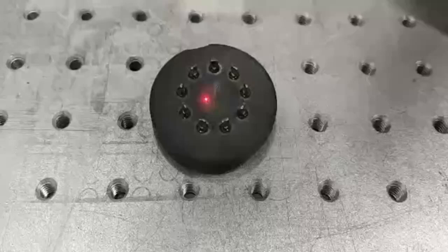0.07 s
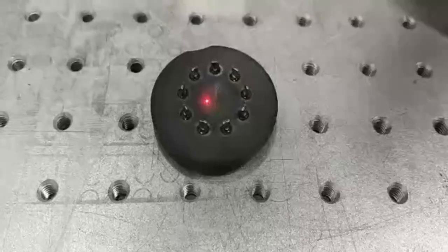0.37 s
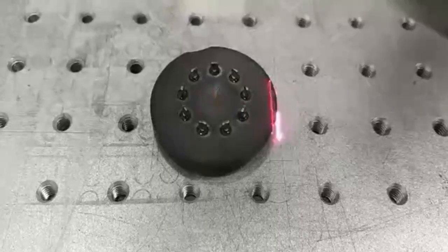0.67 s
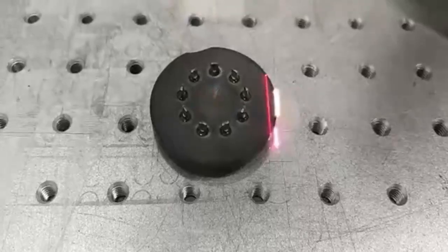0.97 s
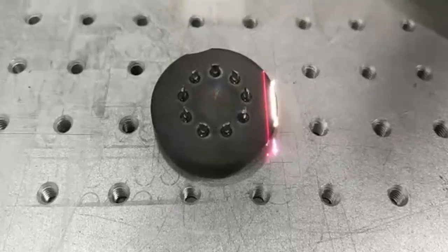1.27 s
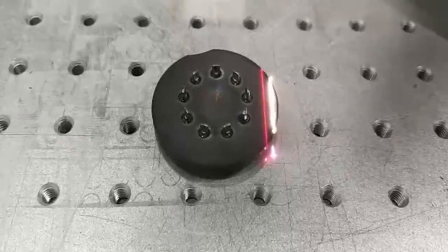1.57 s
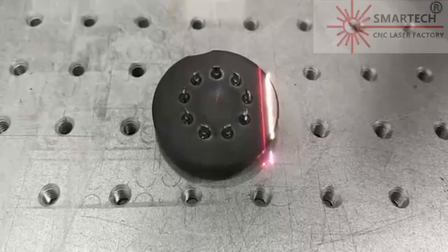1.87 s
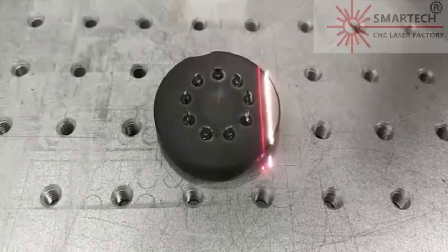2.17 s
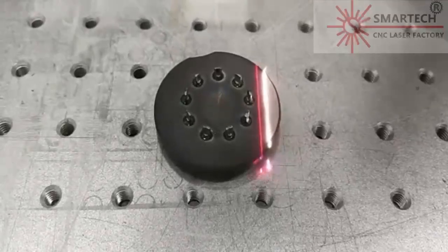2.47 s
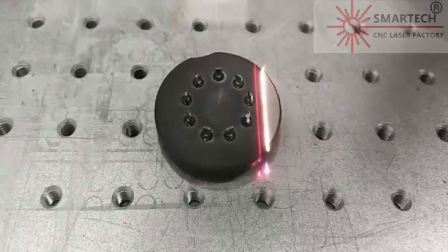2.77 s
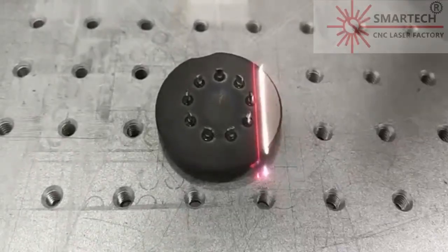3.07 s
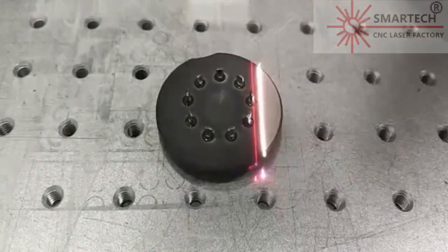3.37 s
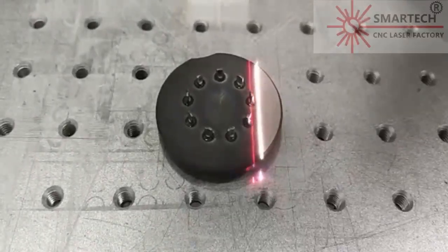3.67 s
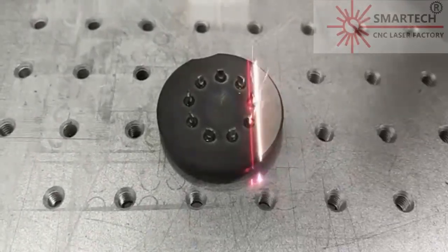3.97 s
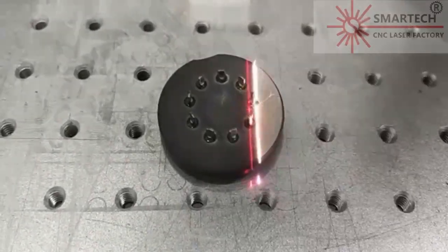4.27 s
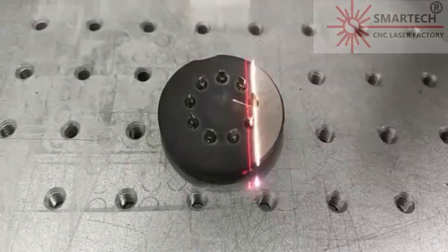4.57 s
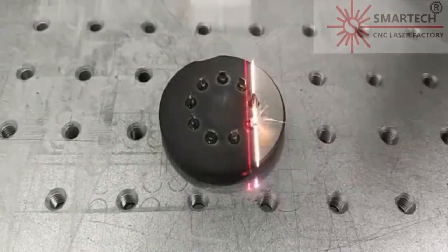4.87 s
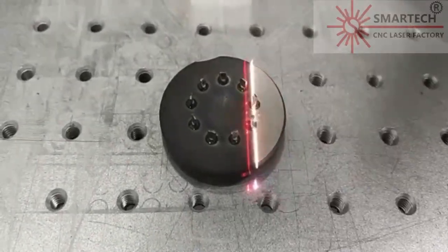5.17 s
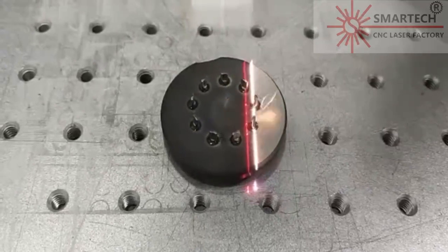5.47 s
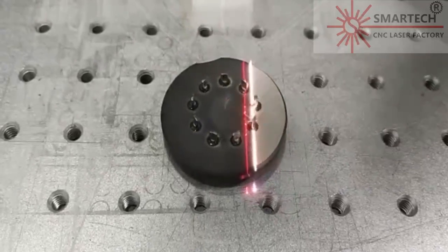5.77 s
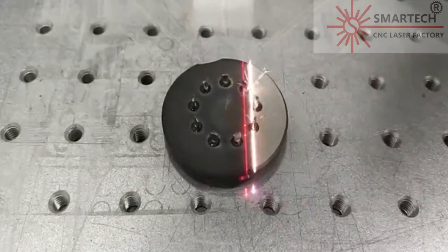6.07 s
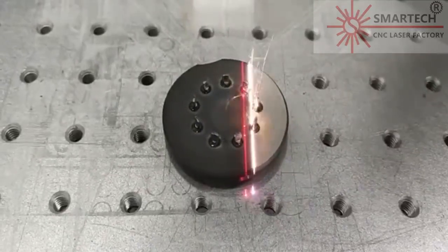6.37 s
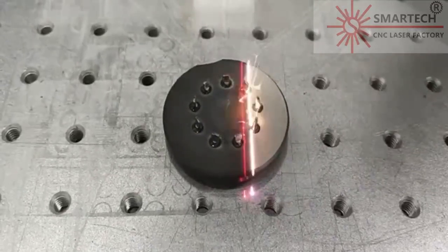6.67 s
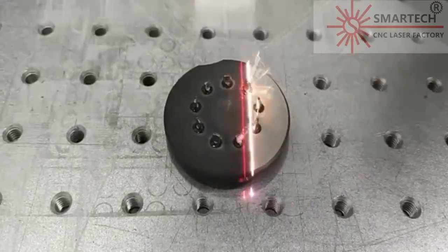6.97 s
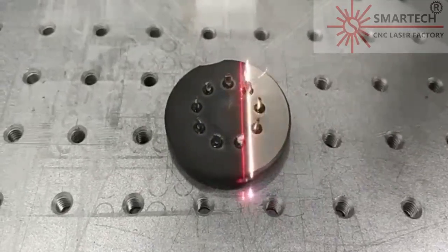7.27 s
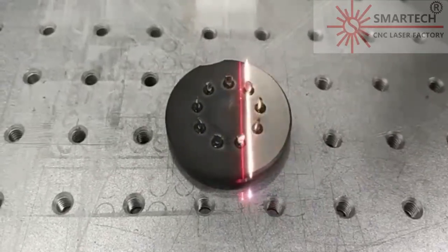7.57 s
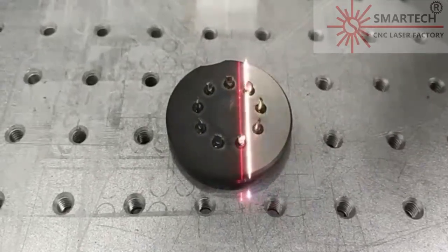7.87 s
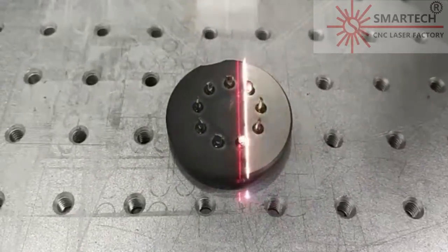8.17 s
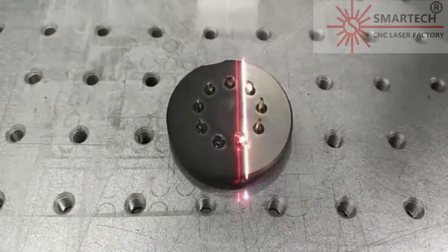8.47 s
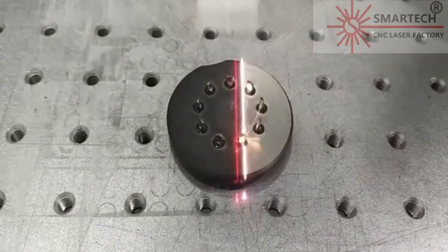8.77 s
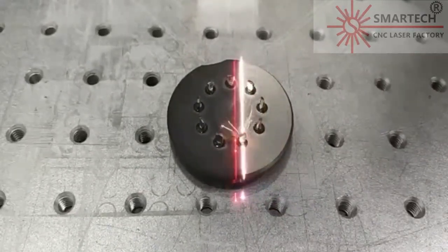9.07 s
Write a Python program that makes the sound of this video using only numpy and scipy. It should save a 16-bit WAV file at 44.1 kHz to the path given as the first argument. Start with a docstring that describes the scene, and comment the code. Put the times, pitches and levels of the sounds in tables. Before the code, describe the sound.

Cooling fans rush steadily while a laser cleaner sizzles on metal, with a thin, high, pulsing whine that falls and fades.

```python
"""A handheld laser cleaner strips the black coat off a round metal part on a steel bench, in mono.
From the start, cooling fans rush (turbulent air in resonant ducts) and hum; the sound drops out briefly.
The beam grazes the rim, then bites in: the coat vaporises in tiny bursts, a sizzle with weak echoes.
The bursts recur at each pass, so they also sing in harmonics, which fall and swell as the passes lengthen.
At last the singing sinks into the sizzle, which carries on over the fans."""
import sys
import numpy as np
from scipy import signal
from scipy.fft import rfft, irfft, next_fast_len
from scipy.io import wavfile
from scipy.ndimage import uniform_filter1d, map_coordinates

SR = 44100
rng = np.random.default_rng(int(sys.argv[2]) if len(sys.argv) > 2 else 0)


def to_wav(s):
    """Save 16-bit WAV."""
    ch = np.atleast_2d(s).T  # columns
    pcm = np.round(np.clip(ch, -1, 1) * 32767)  # PCM
    wavfile.write(sys.argv[1], SR, pcm.astype(np.int16))


N = 411012
TIME = np.arange(N) / SR


def amp(db):
    """Amplitude ratio of a level in decibels."""
    return 10 ** (np.asarray(db) / 20)


def unit(x):
    """Normalisation to an rms of 1."""
    return x / np.sqrt(np.mean(np.abs(x) ** 2) + 1e-20)


def since(start_s):
    """Elapsed time in seconds, zero before the start."""
    return np.maximum(TIME - start_s, 0)


def rise(start_s, length_s):
    """Linear ramp from 0 to 1 that stays at 1."""
    return np.minimum(since(start_s) / length_s, 1)


def wobble(knots_per_s):
    """Smooth random modulation: a spline through Gaussian knots."""
    coarse = np.arange(0, N + 64, 64)
    knots = rng.standard_normal(int(N * knots_per_s / SR) + 4)
    return np.interp(np.arange(N), coarse, map_coordinates(knots, [coarse * knots_per_s / SR]))


def colour(points, hz):
    """Spectral envelope: gain through (frequency [Hz], level [dB]) points on a log frequency axis."""
    points_hz, db = np.transpose(points)
    return amp(np.interp(np.log(hz + 1), np.log(points_hz + 1), db))


def resonance(hz, centre_hz, width_hz):
    """Lorentzian resonance curve, gain 1 at its centre."""
    return 1 / (1 + 2 * ((hz - centre_hz) / width_hz) ** 2)


def filtered(x, response):
    """Linear filtering: the spectrum of x times a frequency response."""
    size = next_fast_len(N + 8192)
    return irfft(rfft(x, size) * response(np.fft.rfftfreq(size, 1 / SR)), size)[:N]


def turbulence(patchy_db, patch_bins):
    """Intermittency: white noise with short, bounded patches of gain in time and frequency."""
    spectra = signal.stft(rng.standard_normal(N), nperseg=1024)[2]
    field = uniform_filter1d(rng.standard_normal(spectra.shape), size=patch_bins, axis=0)
    field = uniform_filter1d(field, size=3, axis=1)
    patches = amp(patchy_db * unit(np.tanh(unit(field))))
    return signal.istft(spectra * patches, nperseg=1024)[1][:N]


# Spectral envelope of the cooling air: (frequency [Hz], relative level [dB])
AIR_SPECTRUM = [(110, -14), (190, -9), (235, -2), (330, -0.5), (440, -4), (540, -3.5), (630, -5), (950, -3),
                (1250, -5), (1700, -7), (2430, -5.5), (3470, -4.5), (4150, -4), (9000, -7.5)]
# Resonances of the ducts and housing: (frequency [Hz], width [Hz], level relative to the air [dB])
DUCT_MODES = [(255, 63, -4.5), (281, 7.9, -2), (350, 54, -4.5), (537, 70, 1.5), (801, 54, 1),
              (1502, 140, 6), (2530, 330, -9), (3700, 240, -2)]


def fan_air(crossover_hz=750, swell_s=1.85, swell_width_s=0.09, swell_db=4):
    """Turbulent flow excites duct resonances: a churning rush that swells once, and a steadier hiss."""
    def ducted(hz):
        mode_power = sum((amp(db) * resonance(hz, centre, width)) ** 2
                         for centre, width, db in DUCT_MODES)
        return colour(AIR_SPECTRUM, hz) * np.sqrt(1 + mode_power)

    def low_share(hz):
        return 1 / (1 + (hz / crossover_hz) ** 4)

    churn = turbulence(patchy_db=3.6, patch_bins=5) * amp(0.7 * wobble(24))
    rush = unit(filtered(churn, lambda hz: ducted(hz) * np.sqrt(low_share(hz))))
    # Response of the outlet: (frequency [Hz], gain [dB])
    outlet = [(700, -13), (1150, -3.5), (1500, -2), (1750, -1.5), (2100, 2), (2700, 0.5), (3250, -3.5),
              (3800, -1), (5200, -0.5), (6500, -2), (7400, 2.5), (9000, -1), (11000, -20.5)]
    flow = turbulence(patchy_db=4, patch_bins=3)
    hiss = unit(filtered(flow, lambda hz: ducted(hz) * colour(outlet, hz) * np.sqrt(1 - low_share(hz))))
    swell = np.exp(-((TIME - swell_s) / swell_width_s) ** 2)
    return amp(-48.5 + swell_db * swell) * rush + amp(-42 + 0.17 * wobble(20)) * hiss


# Fan and pump tones: (frequency [Hz], level [dB])
ROTOR_TONES = [(208, -72), (237, -63.5), (286, -68), (414, -67.5), (468, -75.5), (555, -65.5), (696, -65.5),
               (1367, -65.5), (1393, -71.5), (1951, -68.5)]


def rotor_hum():
    """Periodic forcing by blades and motors radiates tones, each unsteady in pitch and strength."""
    tones = np.zeros(N)
    for hz, db in ROTOR_TONES:
        phase = 2 * np.pi * np.cumsum(hz + 4.5 * wobble(35)) / SR
        waver = amp(3 * wobble(16))
        tones += amp(db) * waver * np.sqrt(2) * np.sin(phase)
    return tones


def early_reflections(x, echo_db, count=24):
    """Reflection: the bench, machine and walls add weak copies within a thirtieth of a second."""
    echoes = np.zeros(SR // 30)
    echoes[rng.integers(SR // 400, len(echoes), count)] = rng.choice([-1, 1], count) / np.sqrt(count)
    reflected = amp(echo_db) * signal.fftconvolve(x, echoes)[:N]
    return (x + reflected) / np.hypot(1, amp(echo_db))


EDGE_S = 0.75  # the beam starts inward from the edge of the part


def scan_rate(first_pass_s=0.002925, growth_s_per_root_s=0.001428):
    """Frequency is the inverse of period: a pass lengthens with its chord, as the root of time."""
    return 1 / (first_pass_s + growth_s_per_root_s * np.sqrt(since(EDGE_S)))


def scan_phase():
    """Phase is the integral of frequency: one cycle for each pass of the beam."""
    return 2 * np.pi * np.cumsum(scan_rate()) / SR


# Hollow bands within the sizzle: (frequency [Hz], width [Hz], level at full strength [dB])
BLIP_BANDS = [(950, 70, -56), (1504, 90, -59.5), (2485, 280, -59.5), (3792, 140, -53.5)]


def hollow_blips(build_s=1.5, ease_db_per_s=0.24):
    """Deep amplitude modulation breaks narrow noise bands into blips, which build and then ease off."""
    blips = np.zeros(N)
    for centre, width, db in BLIP_BANDS:
        band = unit(filtered(rng.standard_normal(N), lambda hz: resonance(hz, centre, width)))
        flutter = amp(7.6 * np.tanh(wobble(34)))
        blips += amp(db) * unit(band * flutter)
    build = 0.5 + 0.5 * rise(EDGE_S, build_s)
    ease = amp(-ease_db_per_s * since(EDGE_S + build_s))
    return build * ease * blips


# Spectral envelope of the vaporising coat: (frequency [Hz], relative level [dB])
VAPOUR_SPECTRUM = [(300, -7), (900, -11.5), (1800, -12.5), (2600, 0.5), (3100, 0), (3450, -9), (4500, -6),
                   (5700, 4), (6500, 2.5), (7400, -2.5), (9000, -1)]


def vapour_sizzle(graze_s=0.35, bite_s=0.82, flare_db=2.5, settle_s=0.55):
    """Ablation: countless vapour bursts, bunched at each pass, sum to noise that flares and settles."""
    graze = amp(-51) * rise(graze_s, length_s=0.25)
    flare = np.exp(-since(bite_s) / settle_s)
    bite = amp(-44 + flare_db * flare) * rise(bite_s, length_s=0.06)
    bursts = turbulence(patchy_db=4.5, patch_bins=3)
    bursts *= amp(0.74 * wobble(600) + 0.5 * np.cos(scan_phase()))
    fizz = unit(filtered(bursts, lambda hz: colour(VAPOUR_SPECTRUM, hz)))
    return np.maximum(graze, bite) * amp(1.1 * wobble(16)) * fizz


def overtones(orders, centre_hz, width_hz, waver_db, jitter_rad):
    """Formant shaping: multiples of the scan rate are loud while they glide through one fixed band."""
    rate, phase = scan_rate(), scan_phase()
    partials = np.zeros(N)
    for k in orders:
        strength = resonance(k * rate, centre_hz, width_hz) ** 2 * amp(waver_db * wobble(16))
        partials += strength * np.sin(k * phase + jitter_rad * wobble(70) + rng.uniform(0, 2 * np.pi))
    return unit(partials)


def beam_singing(straddle_hz=3055, trough_db=-15, hold_until_s=2.3, fade_db_per_s=12, trace_db=-14):
    """Periodic bursts form a harmonic series, which falls with the scan rate and fades to a trace."""
    main = overtones(np.arange(9, 21), centre_hz=3095, width_hz=470, waver_db=1.3, jitter_rad=0.2)
    # Outward and return strokes differ, which adds half-integer orders.
    upper = overtones(np.arange(36, 68) / 2, centre_hz=5900, width_hz=1500, waver_db=3, jitter_rad=0.5)
    # The level swells whenever two harmonics straddle one pitch, so the swells slow with the glide.
    straddle = np.sin(np.pi * straddle_hz / scan_rate()) ** 2
    swell = amp(trough_db) + (1 - amp(trough_db)) * straddle
    fade_db = np.maximum(-fade_db_per_s * since(hold_until_s), trace_db)
    envelope = amp(-48 + fade_db) * rise(EDGE_S, length_s=0.26) * swell
    return envelope * (main + amp(-6) * upper)


def scene():
    """Superposition of the fans and the beam, the same in both channels."""
    sizzle = early_reflections(vapour_sizzle() + hollow_blips(), echo_db=-9)
    beam = sizzle + beam_singing()
    mono = fan_air() + rotor_hum() + beam
    return np.array([mono, mono])


# A muted first instant and one dropout in two steps: (start time [s], end time [s], gain [dB])
DROPOUTS = [(0, .037, -70), (.32, .337, -21), (.337, .351, -46)]


def dropout_gain():
    """Gating: the gain is 1 except during brief dips with smoothed edges."""
    gain = np.ones(N)
    for start, end, db in DROPOUTS:
        gain[(TIME >= start) & (TIME < end)] = amp(db)
    return uniform_filter1d(gain, size=32)


def record(dry):
    """Band limiting: the microphone sheds the bass and the top; the sound cuts in and drops out once."""
    # Bass response: (frequency [Hz], gain [dB])
    bass_cut = [(30, -27.5), (75, -27), (105, -22), (150, -10.5), (200, -0.5)]
    top_hz, taper_hz = 9110, 140
    gated = filtered(dry[0], lambda hz: colour(bass_cut, hz)) * dropout_gain()
    mono = filtered(gated, lambda hz: np.clip((top_hz - hz) / taper_hz, 0, 1))
    return np.array([mono, mono])


dry = scene()
out = record(dry)
to_wav(out)
```